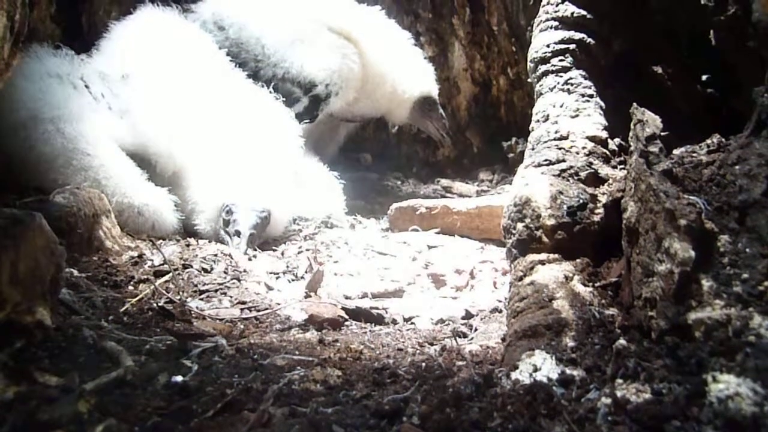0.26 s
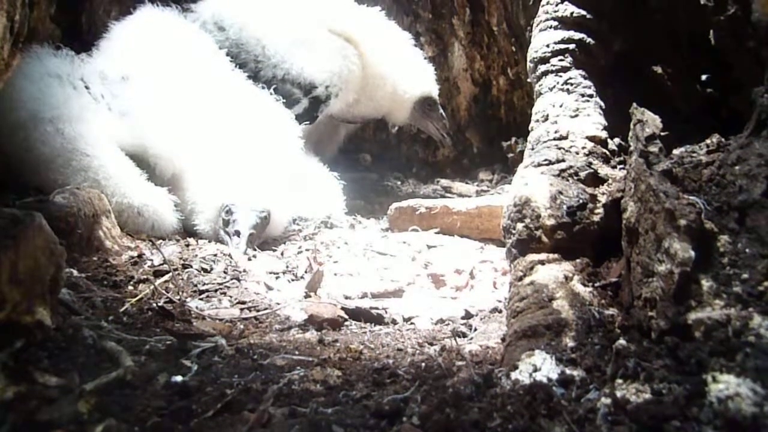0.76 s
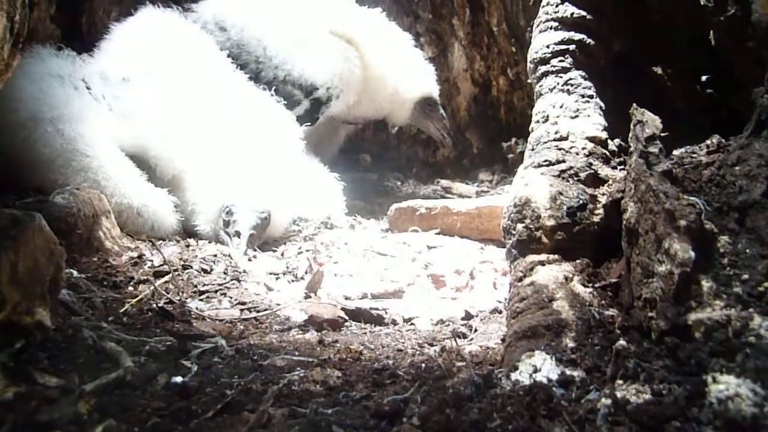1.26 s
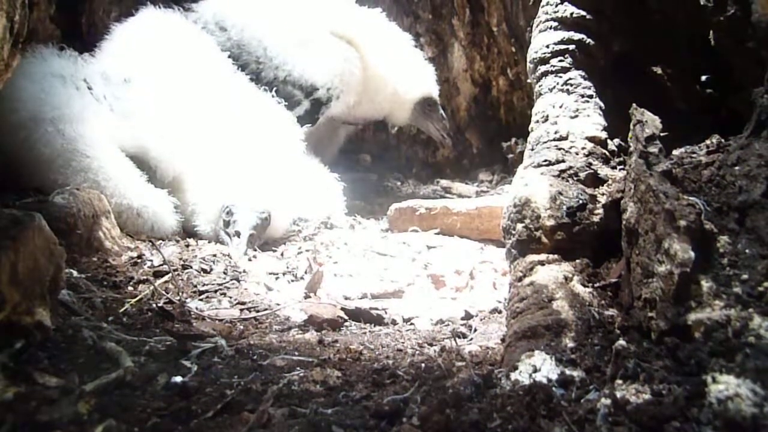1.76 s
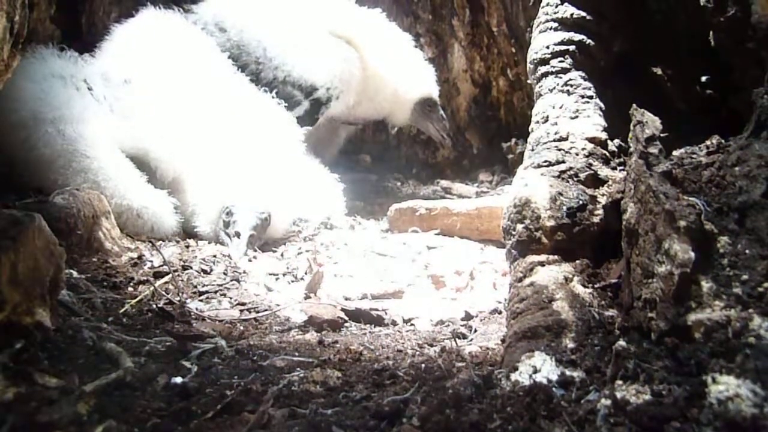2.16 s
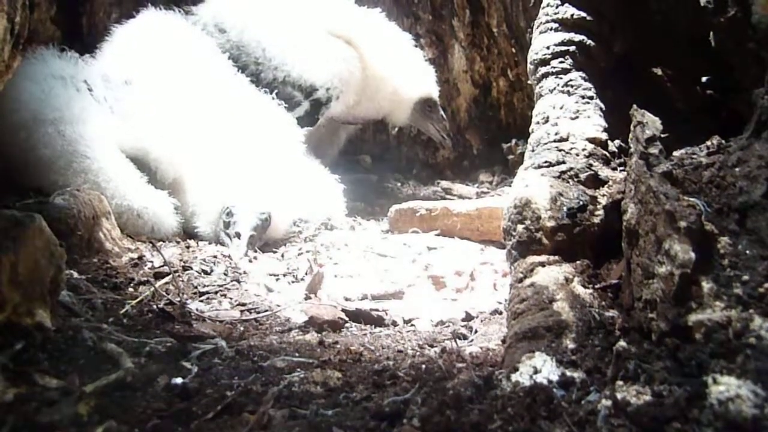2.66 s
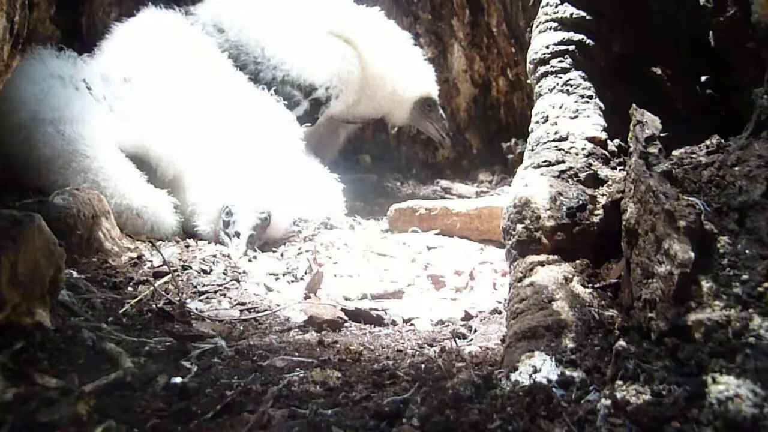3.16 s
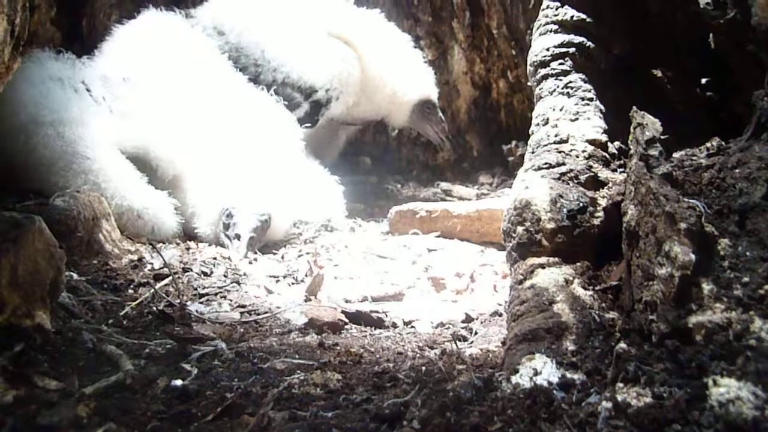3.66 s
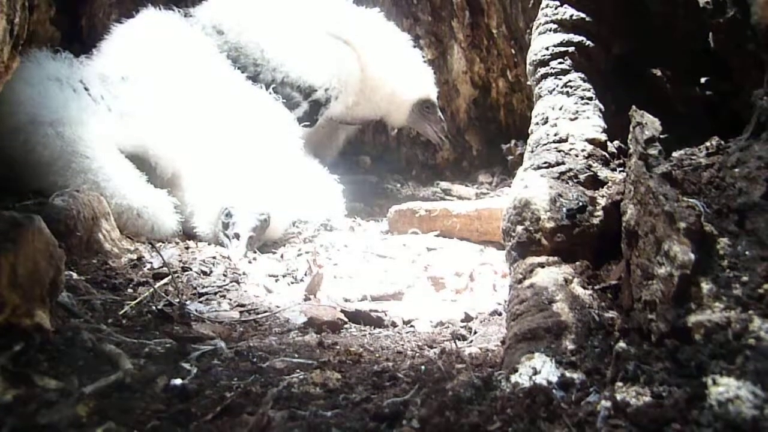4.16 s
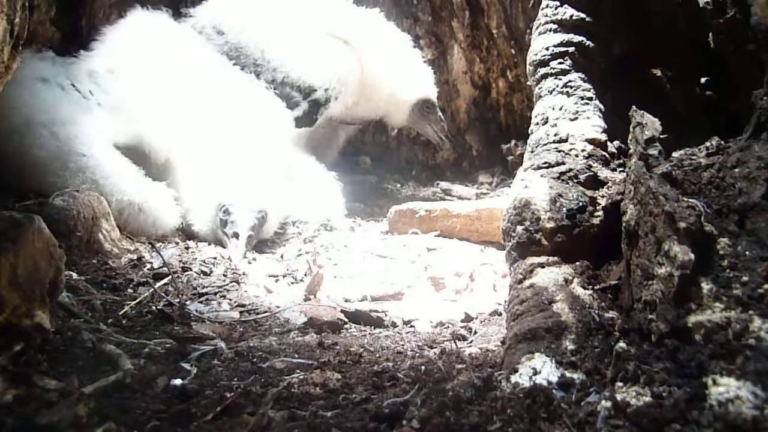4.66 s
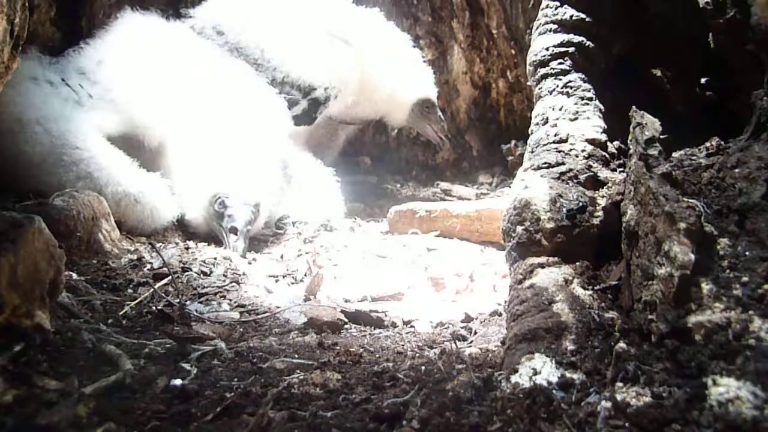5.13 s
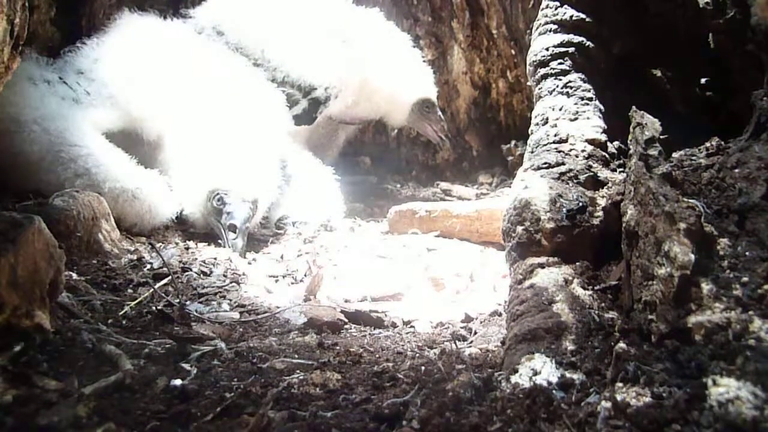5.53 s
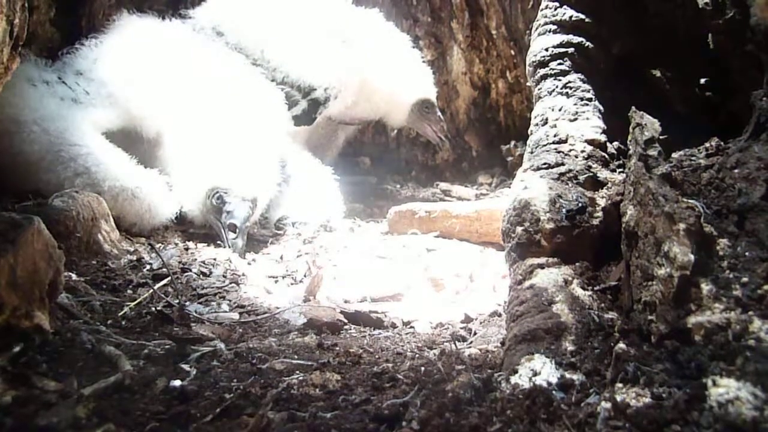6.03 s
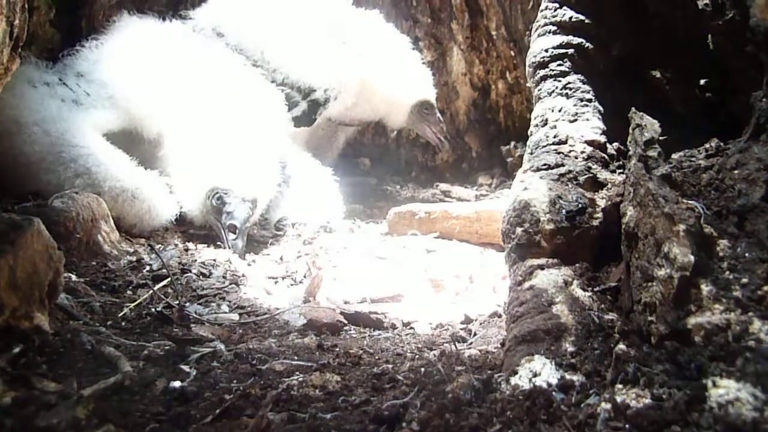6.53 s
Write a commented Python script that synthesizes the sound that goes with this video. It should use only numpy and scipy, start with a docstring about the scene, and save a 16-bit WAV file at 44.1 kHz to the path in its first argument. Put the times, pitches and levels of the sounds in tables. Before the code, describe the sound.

Inside a hollow tree, three bumps on the trunk boom deeply, followed by lighter knocks. Small hollow clicks and a brief crackle of dry wood chips come from the nest, while two songbirds whistle faintly outside. Then a vulture chick starts one long hiss close to the microphone, a low fluttering roar under a breathy rasp, which swells, brightens and holds to the end over soft forest air.

```python
"""A vulture chick's long, swelling hiss, heard up close in the hollow tree where two chicks nest.
Turbulent air rings its throat in a low fluttering roar, under a rasping rush through the opening beak.
Mostly before the hiss, the trunk is bumped and booms, short clicks and crackles come from the nest,
and two songbirds, one near and one far, whistle outside over the soft bed of the woods."""
import sys
import numpy as np
from scipy import signal
from scipy.fft import rfft, irfft, next_fast_len
from scipy.io import wavfile
from scipy.ndimage import map_coordinates

SR = 44100
rng = np.random.default_rng(int(sys.argv[2]) if len(sys.argv) > 2 else 0)


def persist_wave(psi):
    """Save psi, clipped to +-1, as 16-bit WAV."""
    counts = np.round(np.clip(psi, -1, 1) * 32767).astype(np.int16)
    wavfile.write(sys.argv[1], SR, np.atleast_2d(counts).T)


N = 299428


def amp(db):
    """Decibels to gain."""
    return 10 ** (np.asarray(db) / 20)


def unit(x):
    """Scale to rms 1."""
    return x / np.sqrt(np.mean(x ** 2) + 1e-20)


def along(points, hz):
    """Read an EQ curve of (f/Hz, level/dB) points on a log frequency axis."""
    f, db = np.transpose(sorted(points))
    return np.interp(np.log(hz + 1), np.log(f + 1), db)


def wobble(rate):
    """A smooth random modulator with `rate` knots a second."""
    knots = rng.standard_normal(int(N * rate / SR) + 4)
    return map_coordinates(knots, [np.arange(N) * rate / SR])


def filtered(x, response):
    """Filter x by a gain given as a function of frequency."""
    size = next_fast_len(len(x) + SR // 2)
    return irfft(rfft(x, size) * response(np.fft.rfftfreq(size, 1 / SR)), size)[:len(x)]


def noise(response):
    """Coloured noise of rms 1."""
    return unit(filtered(rng.standard_normal(N), response))


def resonance(f, hz, width):
    """Response of one resonance, 1 at its centre."""
    return 1j * f * width / (hz * hz - f * f + 1j * f * width)


def add(track, s, sound):
    """Mix a sound into the track at time s."""
    part = track[round(s * SR):][:len(sound)]
    part += sound[:len(part)]


def forest():
    """The soft, steady bed of the woods."""
    # forest air spectrum: f/Hz, level/dB
    bed_eq = [(15, -63.5), (25, -27.5), (52, -17), (110, -6), (146, -7.5), (190, -8.5), (224, -8.5),
              (656, -14.5), (739, -14), (916, -15.5), (984, -14.5), (1920, -20.5), (3320, -21),
              (6320, -33.5), (7470, -53), (9710, -75.5), (16400, -120)]
    return amp(-50.5 + 0.28 * wobble(5.3)) * noise(lambda f: amp(along(bed_eq, f)))


def scattered(x, t60):
    """Diffuse reverb from wood and leaves, dying by 60 dB in t60 seconds."""
    t = np.arange(SR) / SR
    tail = rng.standard_normal(SR) * amp(-60 * t / t60)
    return signal.fftconvolve(x, tail / np.linalg.norm(tail))[:N]


def whistles(notes, warble, thins_db):
    """Slurred notes ease into a turn, then slide off and settle; the pitch trembles by a share, warble."""
    settle_s, fade_s = 0.0092, 0.0045
    easy_hz = 3270  # above this the voice loses thins_db per octave
    out, tremble = np.zeros(N), 1 + warble * wobble(400)
    for s, lead, tail, start_hz, turn_hz, end_hz, db in notes:
        t = np.arange(-lead, tail, 1 / SR)
        before = np.clip(-t / lead, 0, 1)
        after = np.expm1(-np.maximum(t, 0) / settle_s) / np.expm1(-tail / settle_s)
        hz = turn_hz + (start_hz - turn_hz) * before ** 1.4 + (end_hz - turn_hz) * after
        phase = 2 * np.pi * np.cumsum(hz * tremble[round(s * SR):][:len(t)]) / SR
        fade = np.clip(np.minimum(t + lead, tail - t) / fade_s, 0, 1)
        accent_db = -13.5 * (before - 0.4) ** 2 - 7 * after  # peaks just ahead of the turn
        thin_db = thins_db * np.log2(np.maximum(hz / easy_hz, 1))
        add(out, s - lead, fade * amp(db + accent_db - thin_db) * np.sin(phase))
    return out


def songbirds():
    """The hollow's walls roughen the near bird, leaves flicker and smear the far one; the woods echo."""
    # near bird's notes: turn t/s, lead-in/s, tail/s, start f/Hz, turn f/Hz, end f/Hz, level/dB
    near_notes = [(1.35, 0.029, 0.0089, 3250, 2970, 3120, -42), (1.372, .024, .006, 2386, 3280, 3380, -38),
                  (1.378, .005, 0.039, 3480, 3900, 2160, -36.5), (1.495, .04, .013, 2080, 2350, 2380, -45),
                  (1.58, .035, 0.011, 2490, 2320, 2380, -42.5), (1.628, .043, .03, 2306, 3855, 2084, -36),
                  (2.868, .024, 0.0059, 3260, 3170, 3220, -39), (2.95, .044, .02, 3070, 2450, 2200, -42),
                  (2.985, .012, .01, 2270, 2430, 2250, -43.5),
                  (3.052, .024, 0.015, 2600, 2620, 2800, -39.5),
                  (3.084, 0.024, .026, 2923, 3240, 2310, -33), (3.143, .032, .012, 2290, 3260, 3500, -36)]
    # far bird's notes: same columns
    far_notes = [(.245, 0.042, 0.02, 2460, 3080, 2450, -60.5), (.275, 0.028, .008, 3580, 4350, 4080, -62),
                 (.878, 0.042, .008, 3000, 4370, 4000, -57), (.935, 0.058, 0.0085, 4200, 2780, 2600, -59),
                 (.985, 0.049, 0.01, 2560, 2340, 2480, -59.5),
                 (1.095, 0.049, 0.0087, 4470, 2600, 2670, -55.5),
                 (1.135, 0.036, 0.015, 2720, 3300, 3100, -57), (2.25, 0.064, .035, 3470, 4400, 3300, -57.5),
                 (2.345, 0.059, .008, 3570, 2450, 2380, -56), (2.405, 0.042, 0.025, 2590, 3300, 3100, -56)]
    near = whistles(near_notes, warble=0.014, thins_db=24)
    far = whistles(far_notes, warble=0.035, thins_db=8) * (1 + 0.7 * wobble(300))
    walls = amp(-9.5) * scattered(near, t60=0.057)
    leaves = amp(3) * scattered(far, t60=0.55)
    woods = amp(-5) * scattered(near + far, t60=0.77)
    return near + walls + far + leaves + woods


def litter():
    """Dry wood chips snap under a shifting foot."""
    # snaps: t/s, level/dB
    snaps = [(1.783, -47), (1.7902, -40.5), (1.818, -45), (2.0423, -46), (2.0516, -33), (2.056, -29.5),
             (2.088, -44), (2.882, -43)]
    # spectrum of a snapping chip: f/Hz, level/dB
    chip_eq = [(500, -12), (1200, 0), (2400, -8.5), (4500, 0), (6400, -6.5), (7800, -28)]
    out, t = np.zeros(N), np.arange(SR // 20) / SR
    for s, db in snaps:
        add(out, s, amp(db + 7.5 - 60 * t / 0.01) * rng.standard_normal(len(t)))
    return filtered(out, lambda f: amp(along(chip_eq, f)))


def ring(modes, t, attack_s, scatter_db, detune, tilt_db):
    """Damped modes, struck a little differently each time; tilt is per octave."""
    hz, db, t60 = np.transpose(modes)[:, :, None]
    size, shift = rng.standard_normal((2, len(modes), 1))
    level_db = db - scatter_db * size + tilt_db * np.log2(hz / hz.mean()) - 60 * t / t60
    sign = (-1) ** np.arange(len(modes))[:, None]
    partials = sign * amp(level_db) * np.sin(2 * np.pi * hz * (1 + detune * shift) * t)
    return np.sum(partials, 0) * (1 - np.exp(-t / attack_s))


def clicks():
    """Small hollow clicks, perhaps of a beak or tongue, and at 2.522 s the throat opening as the hiss begins: a
    noisy crack and a short ring."""
    # clicks: t/s, level/dB, brightness/dB
    hits = [(0.181, -29, -5), (0.3154, -31, -6.5), (0.653, -31, -6), (0.7851, -25.5, -5.5),
            (1.4539, -33, -6.5), (1.5873, -26, -5), (2.253, -31.5, -1), (2.386, -27, -4.5),
            (2.522, -26, -4.5), (2.719, -31, -8.5), (2.852, -37, -8.5), (3.8536, -38, -13),
            (3.989, -33, -12.5)]
    # a click's hollow ring: f/Hz, level/dB, t60/s
    modes = [(964, -18.5, 0.06), (1240, -1, 0.031), (1274, -5.5, 0.035), (1857, -7, 0.027),
             (2055, 1.5, 0.021), (2600, -7.5, 0.017), (3660, -5, 0.015), (5150, -12, 0.021)]
    # spectrum of its transient: f/Hz, level/dB
    crack_eq = [(500, 6), (1100, 6), (2600, -10), (5300, -8), (6300, -33), (7600, -49)]
    tones, cracks, t = np.zeros(N), np.zeros(N), np.arange(SR // 10) / SR
    for s, db, bright_db in hits:
        tone = ring(modes, t, attack_s=0.00068, scatter_db=1.5, detune=0.026, tilt_db=bright_db)
        add(tones, s, amp(db - 5) * tone)
        add(cracks, s, amp(db - 2 + bright_db - 60 * t / 0.043) * rng.standard_normal(len(t)))
    return tones + filtered(cracks, lambda f: amp(along(crack_eq, f)))


def pushed(modes, t, contact_s, spot_hz):
    """One push rings the modes, favouring those near the spot's pitch; longer contact sounds duller."""
    spot_db, reach_octaves = 6, 0.14
    hz, db, t60 = np.transpose(modes)[:, :, None]
    favour_db = spot_db * np.exp(-(np.log2(hz / spot_hz) / reach_octaves) ** 2)
    level_db = db + favour_db + 0.9 * rng.standard_normal((len(modes), 1)) - 60 * t / t60
    ringing = np.sum(amp(level_db) * np.cos(2 * np.pi * hz * t), 0)
    return filtered(ringing, lambda f: 1 / (1 + 2j * np.pi * f * contact_s) ** 2)


def bumps():
    """Each bump on the trunk layers a dull scuff, a wooden knock and a slower push that booms inside."""
    # bumps: t/s, boom level/dB, push/s, knock level/dB, contact/s, struck spot f/Hz, scuff level/dB
    hits = [(0.3927, -4, 0.0014, -7, 0.00057, 447, -37.5), (0.6806, -5.5, 0.0011, -21, 0.0002, 485, -43),
            (1.1108, 4.5, 0.0027, -10.5, 0.00057, 318, -35), (1.791, -36, 0.0013, -31, 0.00063, 310, -36),
            (1.936, -20.5, 0.0014, -45, 0.0008, 300, -45), (1.9702, -25, 0.0019, -20.5, 0.00056, 270, -48),
            (1.977, -26.5, 0.00086, -26.5, 0.0005, 540, -48), (2.052, -46, 0.0012, -27, 0.0008, 270, -61),
            (2.267, -23, 0.00071, -29, 0.00086, 260, -46), (2.883, -47, 0.001, -46, 0.0005, 400, -36.5)]
    # modes of the air in the hollow: f/Hz, level/dB, t60/s
    air_modes = [(61, -16, 0.45), (101.1, -25.5, 0.69), (122, -9.5, 0.15), (135.7, -1.5, 0.16),
                 (164.6, -6.5, 0.18)]
    # modes of the wooden wall: f/Hz, level/dB, t60/s
    wall_modes = [(199.5, -4.5, 0.12), (224, -12.5, 0.13), (272, -5, 0.074), (315, -6, 0.06),
                  (338, -17, 0.14), (411, -12.5, 0.093), (433, -7, 0.079), (605, -22, 0.068),
                  (784, -13, 0.053), (954, -5, 0.025)]
    # spectrum of soft contact on bark: f/Hz, level/dB
    scuff_eq = [(60, -17.5), (400, 0.5), (700, -8), (1050, -8), (1600, -9.5), (3000, -11.5), (4200, -24.5),
                (6300, -33), (7600, -53)]
    radiates_hz = 154  # below this the trunk moves ever less air
    body, scuffs, t = np.zeros(N), np.zeros(N), np.arange(SR // 2) / SR
    for s, boom_db, push_s, knock_db, contact_s, spot_hz, scuff_db in hits:
        add(body, s, amp(boom_db) * pushed(air_modes, t, push_s, spot_hz))
        add(body, s, amp(knock_db) * pushed(wall_modes, t, contact_s, spot_hz))
        add(scuffs, s, amp(scuff_db + 18.5 - 60 * t / 0.05) * rng.standard_normal(len(t)))
    thuds = filtered(body, lambda f: (f / (radiates_hz + 1j * f)) ** 2)
    return thuds + filtered(scuffs, lambda f: amp(along(scuff_eq, f)))


def jet_edge():
    """A thin jet of air spits, giving the hiss its bright edge."""
    # jet spectrum: f/Hz, level/dB
    jet_eq = [(3500, -35.5), (4800, -7), (5300, 0.5), (5750, -1), (6150, 1), (6450, -9.5), (6600, -4.5),
              (7000, -15), (7150, -11), (7700, -36)]
    return unit(noise(lambda f: amp(along(jet_eq, f))) * amp(1.3 * wobble(700)))


def beak_rush(gape):
    """Air rushes through the beak; nearly shut, it rings more sharply and lets out less low end."""
    # air in the open beak, notched by the mouth cavity: f/Hz, level/dB
    rush_eq = [(450, -33.5), (800, -2.5), (1090, -4.5), (1200, -0.5), (1360, -2), (1450, -8), (1540, -7.5),
               (1620, -15), (1680, -16.5), (1750, -3.5), (1880, -5.5), (2470, -2), (2740, 1), (3020, -2.5),
               (3520, 2), (3920, -3.5), (4940, -6.5), (5350, -13), (6150, -14.5), (7470, -45), (9710, -71),
               (16400, -120)]
    # mouth and windpipe resonances: f/Hz, width/Hz, boost nearly shut/dB, boost open/dB
    mouth = [(1170, 220, 10, -3), (1892, 120, 12.5, -1.5), (2074, 67, 7.5, 3), (2260, 130, 4.5, 2),
             (2760, 130, 6.5, 2.5), (3160, 110, 2, 0), (3584, 130, 4.5, 1.5), (4050, 210, 3, 1),
             (4837, 150, 8, -3.5), (6120, 130, 7, 1.5), (6560, 130, 8, 3.5)]
    # extra colour of a nearly shut beak: f/Hz, level/dB
    narrow_eq = [(1400, -11.5), (1850, -1), (3500, -4), (4800, -1.5), (5400, -5), (6200, 1)]
    wide_db = lambda f: sum(db * abs(resonance(f, hz, width)) ** 2 for hz, width, _, db in mouth)
    shut_db = lambda f: sum(db * abs(resonance(f, hz, width)) ** 2 for hz, width, db, _ in mouth)
    wide = noise(lambda f: amp(along(rush_eq, f) + wide_db(f)))
    narrow = noise(lambda f: amp(along(rush_eq, f) + shut_db(f) + along(narrow_eq, f)))
    opening = gape ** 1.26
    return opening * wide + np.sqrt(1 - opening ** 2) * narrow  # equal-power crossfade


def throat_roar(gape):
    """Turbulent air rings the throat; a wider gape brings in the higher resonances."""
    # throat resonances: f/Hz, width/Hz, level/dB, gape at which each is half faded in
    throat = [(178, 44, -15, -0.68), (272, 71.5, -2, -0.025), (332.3, 61.4, 0.5, -0.019),
              (385, 44, -5, 0.42), (429, 62, -2, 0.25), (479, 73, -5, 0.94), (547.6, 77.4, -3.5, 0.32),
              (631, 78, -9, 0.52), (770, 74, -19, 0.54)]
    gains, bands = [], []
    for hz, width, db, half_gape in throat:
        tilt_db = 4 * gape * np.log2(hz / 400)
        fade_in = 1 / (1 + np.exp((half_gape - gape) / 0.13))
        gains.append(amp(db + tilt_db) * fade_in)
        bands.append(noise(lambda f: resonance(f, hz, 2 * width) ** 3))
    return np.sum(np.multiply(gains, bands), 0) / np.linalg.norm(gains, axis=0)


def swells_and_dips():
    """Brief, irregular swells and dips in the loudness of the hiss's roar, rush and bright edge, in dB."""
    # swells and dips: t/s, half length/s, roar level/dB, rush level/dB, edge level/dB
    level_offsets = [(2.554, 0.028, 1.5, 1, 0), (3.176, 0.044, -3, -1.5, -1), (3.58, .08, 0.5, 1, 2),
                     (4.112, 0.041, 1, 3, 6), (4.374, 0.12, 1, 1.5, 3), (4.583, 0.055, 0.5, 0, 3.5),
                     (4.903, 0.032, -2, -2, 5), (5.177, 0.065, 2, 1.5, 0), (5.384, 0.022, 3, 1, -3),
                     (5.648, 0.14, 1.5, 0.5, -2.5), (5.83, 0.052, 0.5, 2, 3), (5.928, 0.069, 1, -1, -5),
                     (6.04, .07, -2.5, 0.8, 1), (6.424, 0.043, -2, -1, 0), (6.69, 0.14, -0.5, -1, 2)]
    s, half_s, *layers_db = np.transpose(level_offsets)
    bells = np.exp(-((np.arange(N) / SR - s[:, None]) / half_s[:, None]) ** 2)
    return np.array(layers_db) @ bells


def hiss_levels(age, gape):
    """Effort lifts roar, rush and jet edge (dB); a wider gape lets out more rush and slackens the jet."""
    swell_db, half_swell_s = 22.5, 0.45
    effort_db = -swell_db / (1 + age / half_swell_s)  # rises fast, then levels off
    roar_db = -23.5 + effort_db
    rush_db = roar_db - 16 + 13.5 * gape
    edge_db = -30.5 + 2.79 * effort_db - 13.5 * gape
    return np.array([roar_db, rush_db, edge_db]) + swells_and_dips()


def hiss():
    """The chick's one long hiss: the vibrating throat roars and chops the air stream into a rasp."""
    # beak opening: t/s, gape (0 shut, 1 wide)
    gape_curve = [(2.5, 0), (2.8, 0.17), (3.15, 0.29), (3.55, 0.39), (3.95, 0.45), (4.4, 0.54), (4.8, 0.82),
                  (5.0, 0.9), (5.6, 0.89), (6.8, 1)]
    start_s, attack_s = 2.482, 0.0067
    travel_samples = 30  # from throat to beak
    t = np.arange(N) / SR
    age = np.maximum(t - start_s, 0)
    gape = np.interp(t, *np.transpose(gape_curve))
    roar_db, rush_db, edge_db = hiss_levels(age, gape)
    flutter = wobble(55)  # the stream is never quite steady
    roar = throat_roar(gape)
    air = amp(rush_db) * beak_rush(gape) + amp(edge_db) * jet_edge()
    rasp = unit(amp(2.2 * np.tanh(np.roll(roar, travel_samples)) + 0.67 * flutter))
    onset = np.minimum(age / attack_s, 1)
    return onset * (amp(roar_db + 0.15 * flutter) * roar + rasp * air)


def scene():
    """Everything heard in the hollow, in mono."""
    return (hiss() + bumps() + clicks() + litter() + songbirds() + forest())[None]


def record(dry):
    """The nest camera's narrow band cuts off the top end steeply."""
    top_hz, rolloff_hz = 7820, 200
    high_cut = lambda f: np.clip((top_hz - f) / rolloff_hz + 0.5, 0, 1)
    return np.array([filtered(x, high_cut) for x in dry])


dry = scene()
out = record(dry)
persist_wave(out)
```